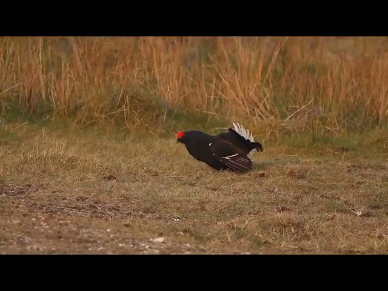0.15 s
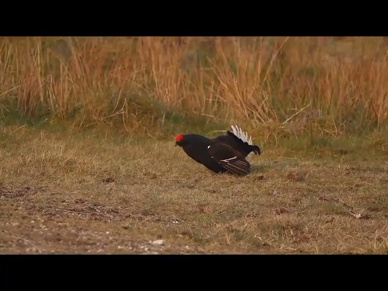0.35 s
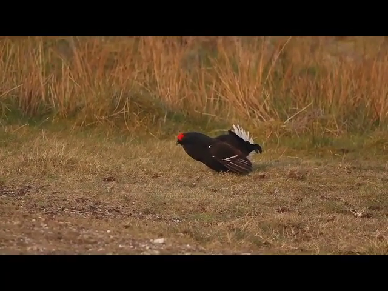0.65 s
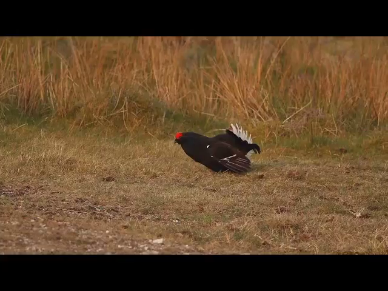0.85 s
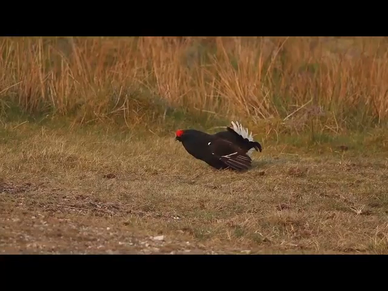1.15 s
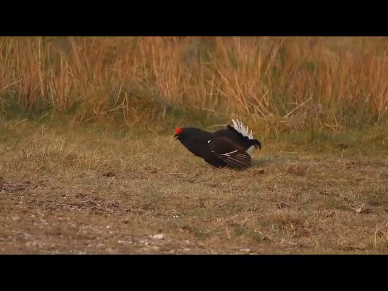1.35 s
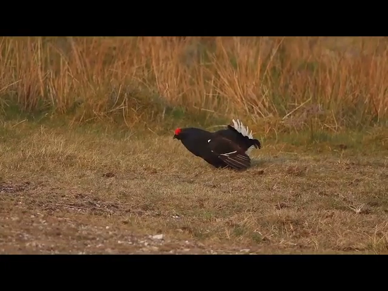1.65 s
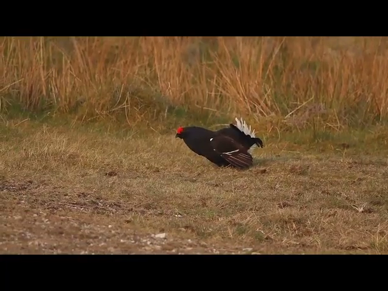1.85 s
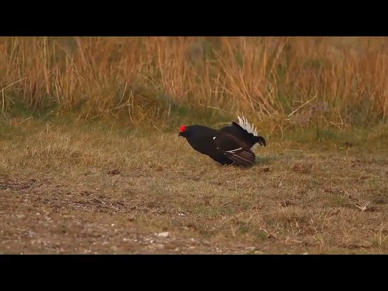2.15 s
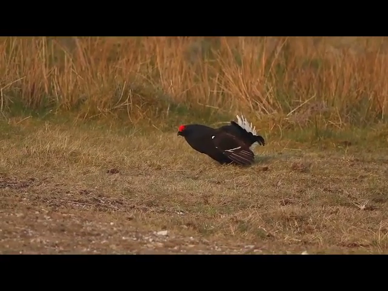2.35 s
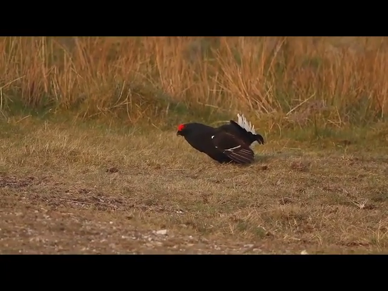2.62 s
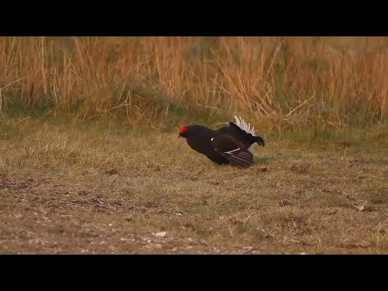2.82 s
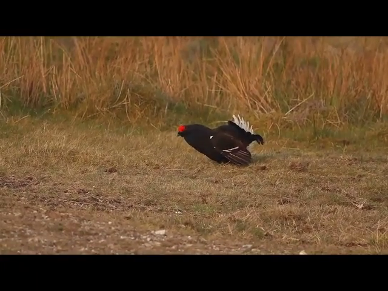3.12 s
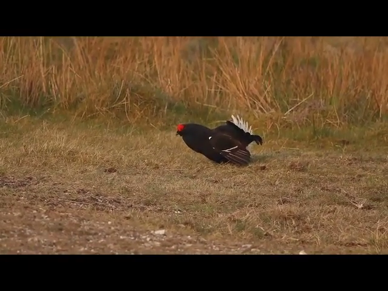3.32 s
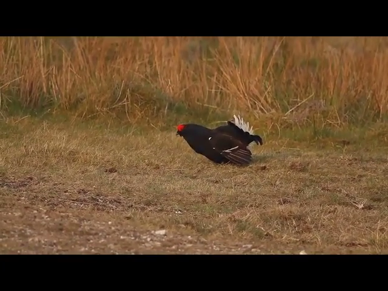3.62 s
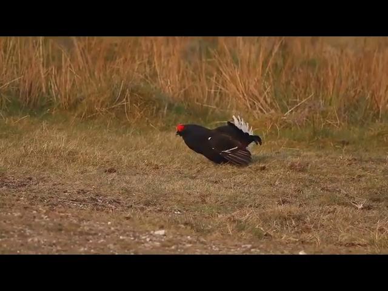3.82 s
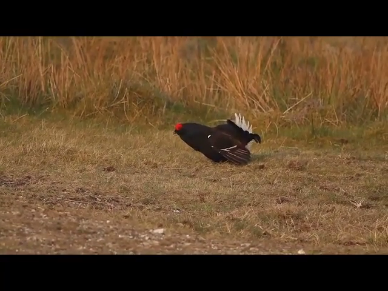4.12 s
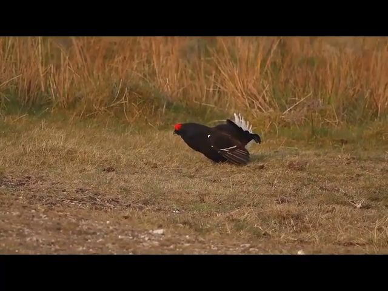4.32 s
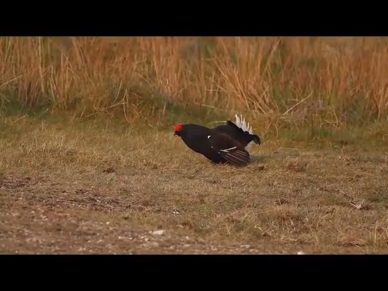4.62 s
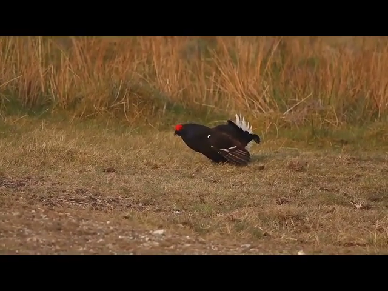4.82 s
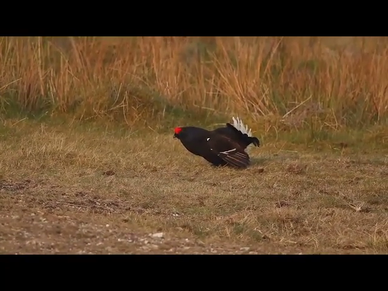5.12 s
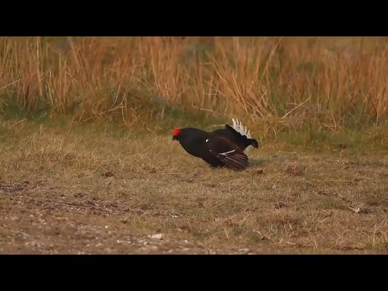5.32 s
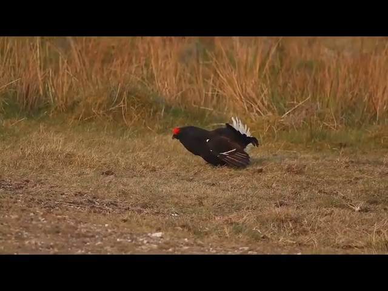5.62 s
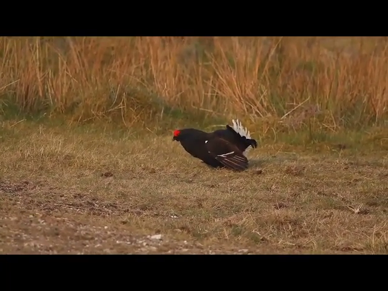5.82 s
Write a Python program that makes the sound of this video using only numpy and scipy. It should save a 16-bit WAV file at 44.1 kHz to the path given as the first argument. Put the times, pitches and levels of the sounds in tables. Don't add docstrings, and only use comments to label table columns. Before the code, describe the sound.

A black grouse sings near-pure, low bubbling coos outdoors, tumbling quickly, then settling into an even roll that swells and climbs, and repeating the pattern. A faint second male bubbles across it. Between about one and three seconds a small songbird whistles, chips and trills further off. Sharp clicks, cloth rustle and late dull knocks are close to the microphone, over faint rumble and hiss.

```python
import sys
import numpy as np
from scipy import signal
from scipy.fft import rfft, irfft, next_fast_len
from scipy.io import wavfile
from scipy.ndimage import uniform_filter1d, map_coordinates

SR = 44100
rng = np.random.default_rng(int(sys.argv[2]) if len(sys.argv) > 2 else 0)


def output_pcm(signal):
    pcm = np.clip(np.atleast_2d(signal).T, -1, 1) * 32767
    wavfile.write(sys.argv[1], SR, np.round(pcm).astype(np.int16))


def gain_from_decibels(decibels):
    exponent = np.asarray(decibels, float) / 20
    return 10 ** exponent


N = 262836
TIME = np.arange(N) / SR

# centre_s, peak_db, pitch_hz
CROWNS = [
    (.03, -44.5, 536.4),
    (2.432, -44.5, 458),
    (2.506, -39.5, 470.4),
    (2.584, -39, 496),
    (2.663, -40, 526),
    (2.706, -45.5, 537),
    (5.173, -39.5, 474),
    (5.228, -44.5, 506),
    (5.488, -41, 515),
]
# centre_s from cue, peak_db, half_ms, pitch_hz, glide_hz_per_ms
HIC = [
    (0, -49, 12, 570, 3),
    (.025, -43.5, 7, 495, -8),
]
TOK = [
    (0, -45, 5.3, 493, -16),
    (.019, -45.5, 8.3, 567, -5.5),
]
# top_s from cue, level_db, top_hz, rise_ms, fall_ms
PAIR = [
    (.011, -40.5, 593, 29, 31.3),
]
BURBLE = [(.002, -44, 536.5, 30, 18.5), (.035, -41, 648, 28, 31.9), (.07, -40, 503, 11.03, 18),
          (.113, -41.5, 602.6, 32, 29.7), (.186, -43.5, 532.5, 20, 29.7), (.201, -42.5, 625, 14, 22),
          (.257, -49, 608, 42, 31.4), (.301, -45, 585.5, 14, 39.3)]
TUMBLE = [(.021, -42, 586, 10.07, 22.3), (.066, -42, 536, 26, 15), (.082, -47.5, 613, 8, 19.4),
          (.133, -41, 649.5, 30, 29)]
CLOSE = [(.002, -40.5, 578, 42, 25.3), (.115, -41, 591, 24.7, 21), (.173, -39, 628, 34, 47)]
SWELL = [
    (.038, -38.5, 635, 28, 32),
    (-.067, -45, 645, 11, 24.7),
]
ASIDE = [(.895, -50, 590, 7.96, 23), (3.596, -44, 565, 30, 3.7), (3.766, -41.5, 600, 24, 37.6),
         (0.88, -52, 545, 13.4, 26), (1.318, -42.5, 575, 9, 31.1), (.672, -46, 524, 22, 21),
         (3.535, -44, 505, 21.9, 25), (3.8, -53.5, 760, 21, 17), (.497, -43.5, 511, 18.4, 9.3),
         (0.745, -50, 500, 18, 16), (0.92, -46, 473, 14.2, 17), (3.925, -36, 540, 12.17, 21.3),
         (.52, -48, 530, 18, 25), (3.51, -44, 379, 14, 14), (5.765, -40, 565, 40, 28),
         (5.846, -41, 525, 38, 24), (5.882, -40, 590, 26, 16), (5.922, -41, 550, 30, 12),
         (5.945, -41.5, 490, 18, 30)]


def unit(x):
    return x / np.sqrt(np.mean(x ** 2) + 1e-20)


def filtered(x, response):
    m = next_fast_len(len(x) + 8192)
    freq_hz = np.fft.rfftfreq(m, 1 / SR)
    return irfft(rfft(x, m) * response(freq_hz), m)[:len(x)]


def noise(spectrum, count=N):
    f, db = np.transpose(spectrum)
    white = rng.standard_normal(count)
    return unit(filtered(white, lambda hz: gain_from_decibels(np.interp(np.log(hz + 1), np.log(f), db))))


def wobble(rate):
    knots = rng.standard_normal(int(N * rate / SR) + 4)
    return map_coordinates(knots, [TIME * rate])


def bells(events, half_ms):
    return sum(db * np.exp(-((TIME - s) * 1000 / half_ms) ** 2 / 2) for s, db in events)


def chirps(rows, arch, skew, scatter=1):
    out = np.zeros(N)
    phases = scatter * rng.random(len(rows))
    for (s, db, ms, hz, glide), phase in zip(rows, phases):
        reach_s = ms / 200
        span = slice(max(round((s - reach_s) * SR), 0), round((s + reach_s) * SR))
        t_ms = (TIME[span] - s) * 1000
        turns = (hz * t_ms + glide * t_ms ** 2 / 2 - arch * t_ms ** 3 / 3) / 1000
        width_ms = ms * (1 - skew * np.sign(t_ms))
        swell = np.exp(-(t_ms / width_ms) ** 2 / 2)
        out[span] += gain_from_decibels(db) * swell * np.cos(2 * np.pi * (turns + phase))
    return out


def echoes(x, t60, wet_db):
    t = np.arange(SR // 2) / SR
    tail = rng.standard_normal(len(t)) * gain_from_decibels(-60 * t / t60) * (t > .004)
    tail /= np.linalg.norm(tail)
    return x + gain_from_decibels(wet_db) * signal.fftconvolve(x, tail)[:N]


def grouse():
    # centre_hz, width_hz
    sac = (360, 780)
    # centre_s, gain_db
    pushes = [(0.45, 8.0), (0.66, 6.5), (0.725, 5.3), (0.985, 6.0), (1.03, 4), (1.053, 8.0), (1.172, 4.3),
              (1.319, 5.2), (1.61, 6), (1.791, 8.5), (1.925, 7), (1.99, 7), (2.406, 5.5), (2.445, 7),
              (2.605, 8), (2.628, 6), (2.903, 4), (3.095, 7), (3.133, 8.5), (3.293, 5.5), (3.334, 8.0),
              (3.354, 8.0), (3.498, 5), (3.671, 7.5), (3.686, 9), (3.71, 5.8), (3.727, 7), (3.769, 4.5),
              (3.853, 4), (3.962, 4.5), (3.993, 8.0), (4.291, 8.0), (4.897, 8.0), (5.003, 10), (5.086, 4.8),
              (5.457, 7.5), (5.625, 8.0), (5.75, 4.5), (5.799, 8.0), (5.843, 5), (5.881, 8.0), (5.89, 8.0),
              (5.917, 4), (5.937, 5)]
    # centre_s, loss_db
    dips = [(0.054, 9.4), (0.151, 14.0), (0.256, 6.3), (0.31, 5), (0.512, 10), (0.524, 9), (0.579, 8.6),
            (0.682, 8.2), (0.75, 11), (0.88, 13.5), (0.916, 7.3), (0.959, 7), (1.002, 7.7), (1.088, 7.8),
            (1.15, 12.1), (1.331, 7), (1.408, 11.2), (2.196, 5), (2.33, 7), (2.459, 9.9), (2.591, 5.3),
            (2.674, 4), (2.844, 8.9), (2.865, 5), (2.982, 6.9), (3.08, 7.0), (3.271, 12), (3.365, 5.1),
            (3.466, 7), (3.486, 5), (3.553, 9.0), (3.604, 15), (3.638, 6), (3.749, 5), (3.802, 5),
            (3.824, 4), (3.873, 4), (3.937, 7.6), (4.087, 10.5), (4.247, 13.6), (4.445, 14),
            (4.509, 8.6), (5.141, 6), (5.277, 7.8), (5.379, 8.4), (5.439, 13), (5.733, 4), (5.822, 8.3)]
    crown_rows = [(s, db, 12.2, hz, -4.5) for s, db, hz in CROWNS]
    voice = chirps(crown_rows, arch=0.08, skew=0.43) + coos()
    voice += chirps(bubble_rows(), arch=0.075, skew=0.15)
    voice += chirps(roll_rows(), arch=0.0047, skew=-0.051)
    voice *= gain_from_decibels(0.84 * wobble(90))
    voice *= gain_from_decibels(bells(pushes, half_ms=4.1) - bells(dips, half_ms=4.1))

    def sac_response(f):
        centre_hz, width_hz = sac
        detune = (f * f - centre_hz * centre_hz) / (f * width_hz + 1)
        return 1 / np.sqrt(1 + detune ** 6 + (f / 690) ** 16)

    return echoes(filtered(voice, sac_response), 0.17, wet_db=-13.5)


def coos():
    # run, cues (start_s, level_db), favoured_hz, favour_db
    coo_runs = [
        (PAIR, [(3.092, -1)], 482, 10.4),
        (BURBLE, [(.51, -3.5), (3.19, -1.5)], 504, 5.5),
        (TUMBLE, [(.909, -2), (3.587, -1)], 517, 6),
        (CLOSE, [(1.177, -3), (3.853, -3)], 522, 5.5),
        (SWELL, [(1.175, -1), (3.853, -0.5)], 600, 2.5),
        (ASIDE, [(0.00041, -3)], 508, 3.3),
        (SWELL[1:], [(1.141, -1.5)], 620, 4),
    ]
    # centre_s, gain_db
    pops = [(.568, 5), (.616, 0), (0.58, 5), (0.8, 1), (.939, 4.5), (1.297, 4), (3.09, 4.5), (2.8, 6),
            (3.248, 4.5), (3.288, 4), (3.375, 4.5), (3.617, 6.5), (3.786, 3), (3.88, 4.5), (4.0, 1.5),
            (.588, 2.5), (1.181, 6), (1.025, 3), (1.322, 3.5), (1.077, 3), (1.112, 3), (.978, 2.5),
            (3.737, 1.5), (4.06, 3), (1.383, 1.5), (.826, 3)]
    foot_hz, favour_width_hz, edge_ms = 392, 100, 10
    out = np.zeros(N)
    for shape, cues, favoured_hz, favour_db in coo_runs:
        for cue, level in cues:
            for s, db, top_hz, rise_ms, fall_ms in shape:
                top_s = cue + s
                span = slice(round((top_s - rise_ms / 1000) * SR), round((top_s + fall_ms / 1000) * SR))
                t_ms = (TIME[span] - top_s) * 1000
                bend = (t_ms / np.where(t_ms < 0, rise_ms, fall_ms)) ** 2
                hz = top_hz - (top_hz - foot_hz) * bend
                to_end_ms = np.minimum(t_ms + rise_ms, fall_ms - t_ms)
                edge = np.sin(np.pi / 2 * np.clip(to_end_ms / edge_ms, 0, 1)) ** 2
                off_db = favour_db * ((hz - favoured_hz) / favour_width_hz) ** 2
                phase = np.cumsum(hz) / SR + rng.random()
                out[span] += edge * gain_from_decibels(db + level - off_db) * np.sin(2 * np.pi * phase)
    return out * gain_from_decibels(bells(pops, half_ms=3.6))


def bubble_rows():
    # (start_s, level_db)
    verses = [
        (HIC, [(2.868, 0.5), (5.523, -0.2)]),
        (TOK, [(.31, 0.5), (2.989, 1.7), (5.636, -9.5)]),
    ]
    # centre_s, peak_db, half_ms, pitch_hz, glide_hz_per_ms
    single_bubbles = [(.203, -56, 8.1, 520, -13), (0.26, -48.5, 5.9, 468, -2), (.382, -46.5, 9.2, 612, 1.5),
                      (2.812, -56, 4, 510, -16), (2.965, -58, 6.2, 647, 10), (5.59, -53.5, 4.1, 520, -12),
                      (.252, -53, 6.5, 523, 0), (.286, -44.5, 13.4, 576, -0.5), (5.641, -41, 2.8, 525, -18),
                      (3.16, -52.5, 4.5, 330, 8), (1.2, -53, 4.7, 480, -2), (.512, -50, 6, 577, 3),
                      (.537, -49, 4, 430, -10), (.546, -50, 7, 632, -1), (.612, -47, 4.7, 422, 7),
                      (.649, -47, 4.3, 423, -10), (.688, -49.5, 5, 400, 7), (.728, -47, 4, 460, -17),
                      (.773, -49, 5, 600, -4), (.794, -46, 5, 490, -4), (.912, -52, 4, 420, -12),
                      (.987, -47.5, 6, 520, -5), (1.014, -49.5, 4.6, 447, 12), (1.052, -48, 5.5, 595, -5),
                      (1.257, -47.5, 10, 540, -3), (3.673, -49, 4.3, 595, -5), (4.464, -55, 5.5, 440, -6),
                      (5.07, -53, 7, 493, -1)]
    rows = [(cue + s, db + level, *rest)
            for shape, cues in verses for cue, level in cues for s, db, *rest in shape]
    pickups = [(s - 0.035, db - 11, 14.4, hz + 35, -1.8) for s, db, hz in CROWNS]
    return rows + pickups + single_bubbles


def roll_rows():
    # first_s, period_s, first_db, first_hz, climb_hz per beat
    even_roll = [
        (1.774, .0662, -52, 438, 2.6),
        (1.8, .0662, -56.5, 384, 3.5),
        (1.821, .066, -55, 400, 4),
    ]
    # centre_s, peak_db, pitch_hz
    uneven_beats = [(1.566, -59, 390), (1.594, -53.5, 476), (1.617, -56, 385), (1.65, -56.5, 396),
                    (1.687, -58, 382), (1.724, -60, 393), (1.75, -56, 434), (4.172, -54, 403),
                    (4.196, -63, 370), (4.228, -58.5, 384), (4.286, -57.5, 450), (4.307, -53, 411),
                    (4.37, -54, 390), (4.425, -53, 413), (4.488, -47.5, 425), (4.55, -51.5, 435),
                    (4.614, -51.5, 414), (4.67, -54, 456), (4.746, -51.5, 443), (4.82, -48.5, 410),
                    (4.869, -53.5, 439), (4.939, -54, 482), (4.966, -50, 406), (5.031, -47.5, 452),
                    (5.097, -45, 466), (5.275, -48, 487), (5.338, -48, 505), (5.404, -44.5, 500)]
    beats, end_s, swell_db = 10, 2.39, 0.0617
    half_ms, glides = (9, 8, 7), (-4, -2.2, -2.5)
    rows = []
    for (first_s, period_s, db, hz, climb_hz), ms, glide in zip(even_roll, half_ms, glides):
        for k in range(beats):
            s = first_s + k * period_s
            if s < end_s:
                rows.append((s, db + swell_db * k * k + rng.normal(0, 0.45), ms, hz + climb_hz * k, glide))
    return rows + [(s, db, 14.3, hz, -2.9) for s, db, hz in uneven_beats]


def songbird():
    # time_s from cue, pitch_hz, level_db
    rise_shape = [(-.072, 3230, -25), (-.064, 3110, -4), (-.05, 3190, -2), (-.029, 4150, 2),
                  (-.014, 4560, 5), (-.005, 5250, 8), (0, 5850, -6), (.005, 5200, 13), (.012, 2800, -18)]
    high_shape = [(-.015, 5460, -38), (-.008, 5410, -6), (0, 5820, -3), (.015, 5770, -1.5), (.028, 5590, 0),
                  (.04, 5540, -4), (.047, 6050, -14)]
    flat_shape = [(-.003, 3820, -25), (.002, 4000, -4), (.01, 4080, 0), (.018, 4110, -1), (.024, 4080, -25)]
    # start_s, level_db, stretch of the pitch range above the foot
    rise_cues = [
        (1.43, -58.5, 0.89),
        (1.66, -53, 0.98),
        (1.866, -55.5, 0.9),
    ]
    high_cues = [
        (1.521, -57.5, 1.),
        (1.732, -54.5, 1.01),
    ]
    flat_cues = [
        (.903, -66, 1.),
        (.955, -66, 1.),
        (1.007, -60, 1.),
        (1.062, -57, 1.),
        (1.116, -59.5, 1.),
        (1.172, -56.5, 1.),
    ]
    # time_s, pitch_hz, level_db
    slur_up = [(2.128, 3170, -77), (2.137, 3450, -57), (2.153, 3660, -56), (2.185, 3770, -62),
               (2.211, 3900, -72), (2.226, 4090, -62), (2.265, 4250, -73), (2.31, 4320, -60),
               (2.36, 4300, -76)]
    slur_down = [(2.383, 3550, -68), (2.4, 4320, -61), (2.42, 4560, -66), (2.444, 4350, -59.5),
                 (2.481, 4120, -63), (2.52, 3640, -63), (2.564, 3350, -61), (2.61, 3200, -62.5),
                 (2.628, 3270, -89)]
    # centre_s, peak_db, half_ms, pitch_hz, glide_hz_per_ms
    chip_rows = [(1.204, -64, 3.5, 3550, -71), (1.215, -62, 3, 3380, -50), (1.226, -57, 2.6, 3620, -34),
                 (1.237, -59, 4, 3900, 10), (1.576, -57, 2.5, 5500, -110), (1.582, -57, 3.5, 5150, -10),
                 (1.788, -52.5, 2.5, 5460, -110), (1.797, -63, 3, 5300, 20), (1.671, -54, 2.4, 5300, 5),
                 (1.972, -57, 3, 4800, -96), (1.984, -56, 3.6, 3980, -110), (.638, -66, 4, 3850, -10),
                 (.654, -65, 4, 3750, -10), (.675, -69, 5, 3450, -20), (.692, -72, 3.7, 3000, -20),
                 (1.26, -65, 3.3, 3270, -40), (1.272, -68, 3, 3020, -20), (.06, -68, 9, 4550, -8),
                 (.11, -71, 9, 4580, -5), (.325, -64, 12, 4520, -7.5), (2.708, -69, 7, 4130, -15),
                 (5.702, -70, 6, 3050, 2), (5.725, -66, 4.5, 3050, 5), (5.745, -63.5, 7.7, 3070, 1),
                 (5.874, -65, 1.6, 4520, -40), (5.889, -67, 1.6, 4020, -40), (5.905, -63, 1.8, 2910, 60)]
    # before_s, level_db, pitch_hz, glide_hz_per_ms
    lead_in = [
        (.025, -1, 3450, -120),
        (.015, -1, 3370, -90),
        (.005, 1, 3600, -110),
    ]
    # first_s, chip_count, level_db, pitch_hz, glide_hz_per_ms
    trill_runs = [
        (1.996, 8, -51, 3520, -95),
        (2.734, 8, -62.5, 3750, -45),
        (2.739, 8, -68, 3250, -90),
    ]

    s, hz, db = np.transpose(slur_up)
    out = whistle(s, hz, db, 40 + 0 * s)
    s, hz, db = np.transpose(slur_down)
    out += whistle(s, hz, db, .15 * (4750 - hz))
    for shape, cues, overtone_db in ((rise_shape, rise_cues, -27), (high_shape, high_cues, -15),
                                     (flat_shape, flat_cues, -24)):
        s, hz, db = np.transpose(shape)
        foot_hz = hz[1]
        for cue, level, stretch in cues:
            out += whistle(s + cue, foot_hz + (hz - foot_hz) * stretch, db + level, 0 * s, overtone_db)
    leads = [(cue - before, -57 - 3.5 * max(4 - k, 0) + db, 2.4, hz, glide)
             for k, (cue, *_) in enumerate(flat_cues) for before, db, hz, glide in lead_in]
    trill_period_s, trill_half_ms = .01325, 2.7
    trills = [(s + k * trill_period_s, db + rng.normal(0, 1), trill_half_ms, hz, glide)
              for s, count, db, hz, glide in trill_runs for k in range(round(count))]
    out += chirps(chip_rows + leads + trills, arch=0, skew=0)
    return echoes(out, .12, wet_db=-14)


def whistle(s, hz, db, quaver, overtone_db=-24):
    span = slice(round(s[0] * SR), round(s[-1] * SR))
    t, out = TIME[span], np.zeros(N)
    beat = np.sin(2 * np.pi * 140 * t)
    pitch_hz = np.interp(t, s, hz) + np.interp(t, s, quaver) * beat
    phase = 2 * np.pi * np.cumsum(pitch_hz) / SR
    tone = np.sin(phase) + gain_from_decibels(overtone_db) * np.sin(2 * phase)
    out[span] = gain_from_decibels(np.interp(t, s, db) + 1.4 * beat) * tone
    return out


def clicks():
    # start_s, peak_db, t60_s, brightness 0-1 (over 1: tiniest ticks)
    click_rows = [(0.356, -49, 0.12, 0.24), (0.379, -47, 0.052, 0.43), (0.4226, -28.5, 0.044, 0.72),
                  (0.432, -41, 0.029, 0.8), (1.095, -55, .02, 0.74), (4.397, -45, 0.022, 0.08),
                  (4.875, -31.5, 0.017, 0.05), (5.233, -44.5, 0.026, 0.1), (5.261, -47.5, 0.026, 0.16),
                  (5.267, -56, .06, 0.2), (5.761, -41.5, 0.021, 0.05), (.833, -66, .02, 1.3),
                  (1.662, -51, 0.032, 0.34), (1.94, -55, 0.052, 0.18), (3.24, -58, .02, .1)]
    # freq_hz, level_db_per_hz
    dull_spectrum = [(250, -7), (500, 0), (1300, 4.5), (2400, -7), (4650, -12), (6000, -18.5), (7500, -36)]
    sharp_spectrum = [(410, -35), (700, -19), (1960, -3), (2480, -0.5), (8560, -6.5), (11700, -0.5),
                      (15800, -10)]
    # freq_hz, level_db
    shell_modes = [(1250, -3), (2400, -1), (3750, -3), (4600, -12)]
    shell_db, shell_t60_s, attack_s = -3, 0.021, 0.00043
    out, t = np.zeros(N + SR), np.arange(SR // 8) / SR
    for s, db, t60, bright in click_rows:
        dull = np.clip(1 - bright, 0, 1) * noise(dull_spectrum, count=len(t))
        ring = sum(gain_from_decibels(level + rng.normal(0, 1.8)) * np.sin(2 * np.pi * hz * t) for hz, level in shell_modes)
        dull += np.clip(1 - 2 * bright, 0, 1) * gain_from_decibels(shell_db - 60 * t / shell_t60_s) * ring
        sharp = bright * noise(sharp_spectrum, count=len(t))
        if bright > 1:
            sharp = unit(np.diff(sharp, 3, prepend=[0, 0, 0]))
        envelope = gain_from_decibels(db - 60 * t / t60) * (1 - np.exp(-t / attack_s))
        out[round(s * SR):][:len(t)] += envelope * (dull + sharp)
    return out[:N]


def knocks():
    # centre_s, peak_db, pitch_hz, half_ms
    knock_rows = [(.378, -38.5, 159, 6.2), (0.508, -54, 45, 6.7), (4.405, -44, 320, 3.9),
                  (4.631, -34.5, 98, 9.9), (4.643, -39.5, 113, 3.5), (4.668, -47, 70, 8.7),
                  (4.687, -49, 75, 10), (4.734, -33.5, 61, 7.1), (4.78, -47.5, 79.5, 6),
                  (4.837, -31.5, 125, 3.4), (4.885, -45.5, 88, 14), (4.882, -40.5, 325, 4.8),
                  (4.987, -35, 140, 3.9), (5.008, -38, 89, 3.2), (5.56, -48.5, 95, 9.6),
                  (5.577, -51, 108, 3.4), (5.602, -50, 59.4, 21)]
    pushes = [(s, db, ms, hz, 0) for s, db, hz, ms in knock_rows]
    edges = [(s, db - 3.5, 0.33 * ms, 1.97 * hz, 0) for s, db, hz, ms in knock_rows]
    return (chirps(pushes, arch=0, skew=-0.22, scatter=0.59)
            + chirps(edges, arch=0, skew=-0.057, scatter=0.23))


def rubbing():
    # time_s, level_db
    rub = [
        [(.69, -66), (.72, -61.5), (.79, -57), (.84, -63), (.87, -75)],
        [(.92, -72), (.95, -64), (.995, -60), (1.008, -64)],
    ]
    zip_strokes = [
        [(.76, -72), (.785, -63), (.81, -69), (.825, -74)],
        [(.93, -70), (.975, -65), (1.0, -61.5), (1.008, -72)],
    ]
    drag = [
        [(4.89, -61), (4.97, -59.5), (5.03, -72)],
        [(5.235, -62), (5.28, -64), (5.37, -68)],
    ]
    scuff = [
        [(.352, -44), (.378, -45), (.41, -49.5), (.445, -49.5)],
        [(5.24, -58.5), (5.265, -46), (5.32, -65)],
    ]
    # freq_hz, level_db_per_hz
    nylon = [(530, -40), (900, -8.5), (2210, -8.5), (2850, 1.5), (3900, -15), (5910, -11.5), (6990, -19.5),
             (13800, -24), (15800, -33)]
    taut = [(2500, -32), (3350, 5), (4200, -17), (5800, -2), (7000, -8), (12000, -8), (15800, -20)]
    felt = [(400, -9), (700, -6.5), (2300, -10.5), (9000, -22), (12000, -41)]
    housing = [(20, -5), (130, -1), (330, -5), (700, -17.5), (2000, -59)]
    return (cloth(rub, nylon, grain_db=2.0) + cloth(zip_strokes, taut, grain_db=2.5)
            + cloth(drag, felt, grain_db=0.0) + cloth(scuff, housing, grain_db=0.0))


def cloth(strokes, spectrum, grain_db):
    grains = unit(noise(spectrum) * gain_from_decibels(grain_db * wobble(250)))
    swell = sum(gain_from_decibels(np.interp(TIME, *np.transpose(rows), left=-120, right=-120)) for rows in strokes)
    return uniform_filter1d(swell, size=600) * grains


def floor():
    # time_s, rumble_db, hiss_db
    floor_levels = [
        (0.0, -61.5, -67.5),
        (5.76, -64, -68.5),
        (5.96, -65, -68),
    ]
    # freq_hz, level_db_per_hz
    rumble_spectrum = [(12, -53), (20, -16.5), (58, -3), (128, -2), (168, 1), (211, -8.5), (300, -13.5),
                       (390, -9), (660, -120)]
    hiss_spectrum = [(150, -48), (250, -1.5), (1090, -9), (1210, -9.5), (1650, -10.5), (5000, -11.5),
                     (15700, -18)]
    s, rumble_db, hiss_db = np.transpose(floor_levels)
    rumble = gain_from_decibels(np.interp(TIME, s, rumble_db) + 1.0) * noise(rumble_spectrum)
    rumble *= gain_from_decibels(1.1 * wobble(4) + 1.2 * wobble(14))
    hiss = gain_from_decibels(np.interp(TIME, s, hiss_db) + 5.5 + 0.69 * wobble(6)) * noise(hiss_spectrum)
    return rumble + hiss


def scene():
    near = clicks() + knocks() + rubbing()
    mono = grouse() + songbird() + near + floor()
    return np.array([mono, mono])


def low_pass(x):
    return signal.sosfilt(signal.butter(12, 16530, fs=SR, output="sos"), x)


def record(dry):
    top_hz, side_from_hz, side_db = 15820, 4000, -9
    mono = filtered(dry[0], lambda hz: hz < top_hz)
    hz, _, z = signal.stft(mono, SR, nperseg=2048)
    chosen = np.repeat(rng.random((15, z.shape[1])) < .055, 70, axis=0)[:len(hz)]
    treble = (hz > side_from_hz)[:, None]
    side = gain_from_decibels(side_db) * signal.istft(1j * z * chosen * treble, SR, nperseg=2048)[1][:N]
    return low_pass(mono + np.array([side, -side]))


dry = scene()
out = record(dry)
output_pcm(out)
```